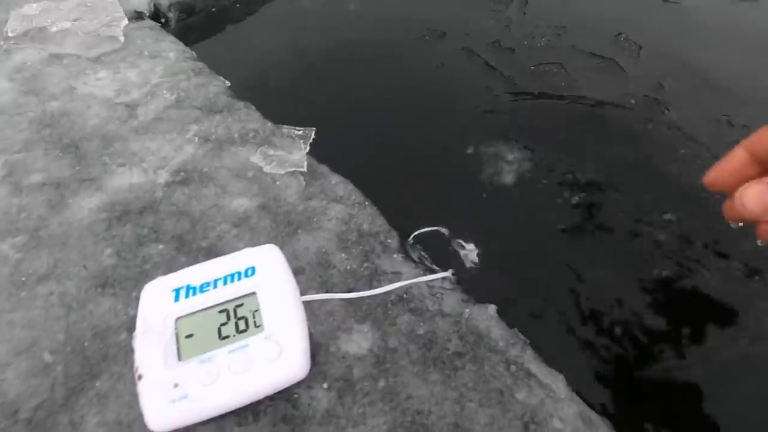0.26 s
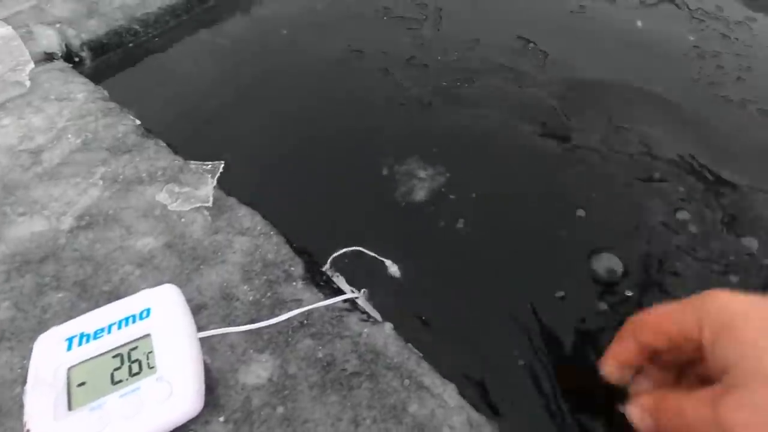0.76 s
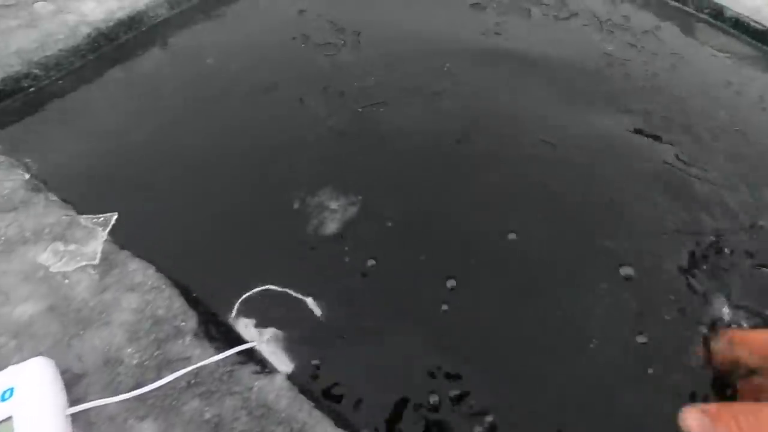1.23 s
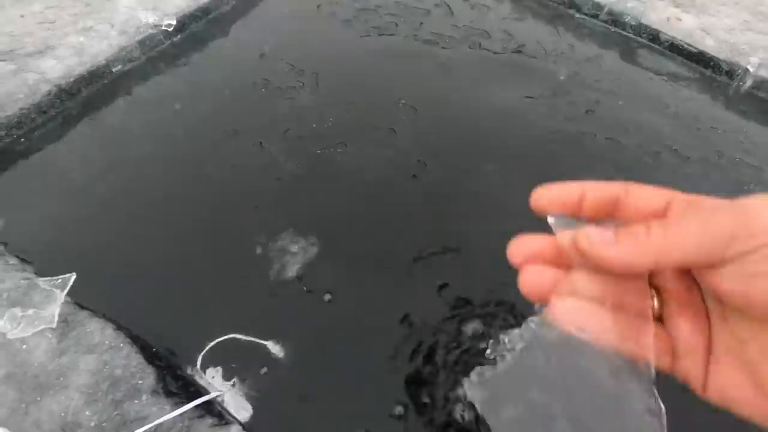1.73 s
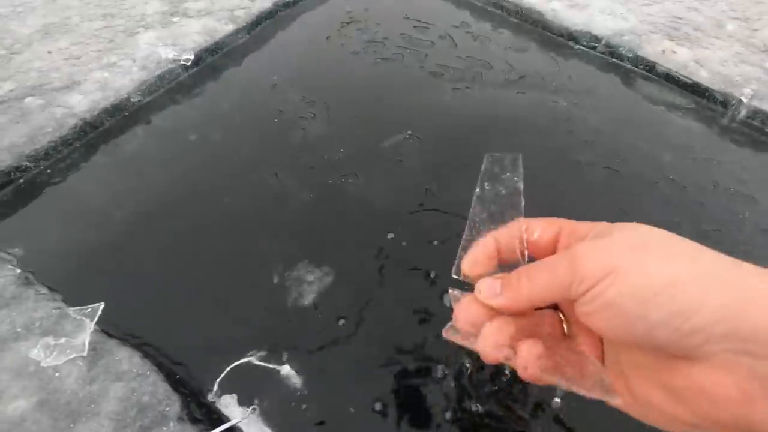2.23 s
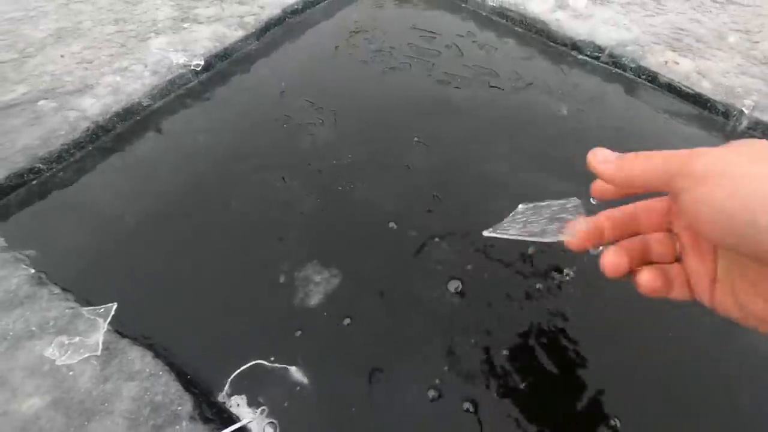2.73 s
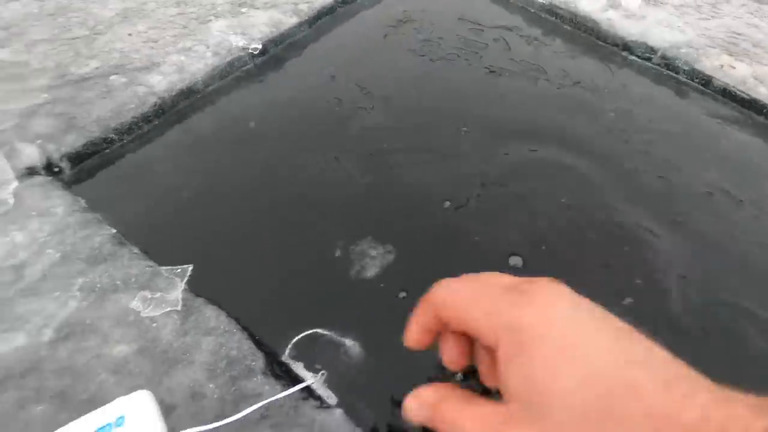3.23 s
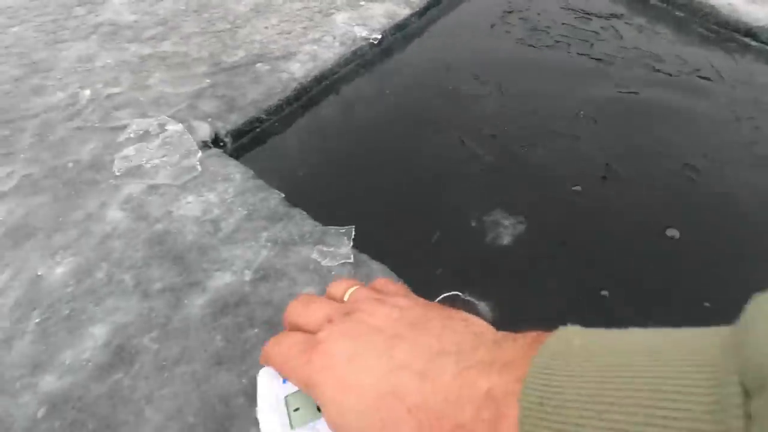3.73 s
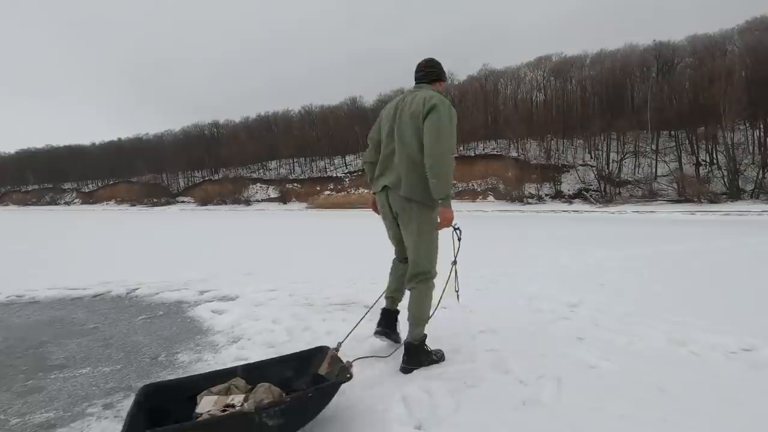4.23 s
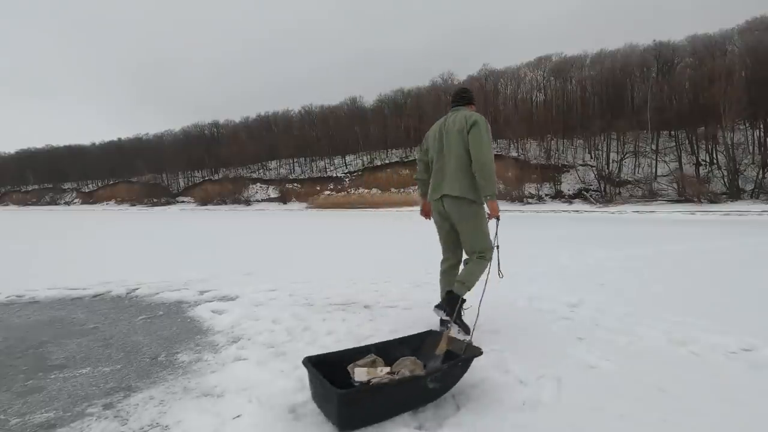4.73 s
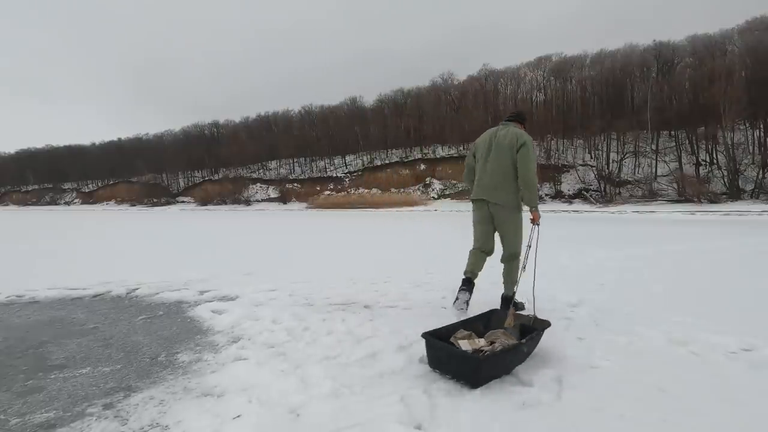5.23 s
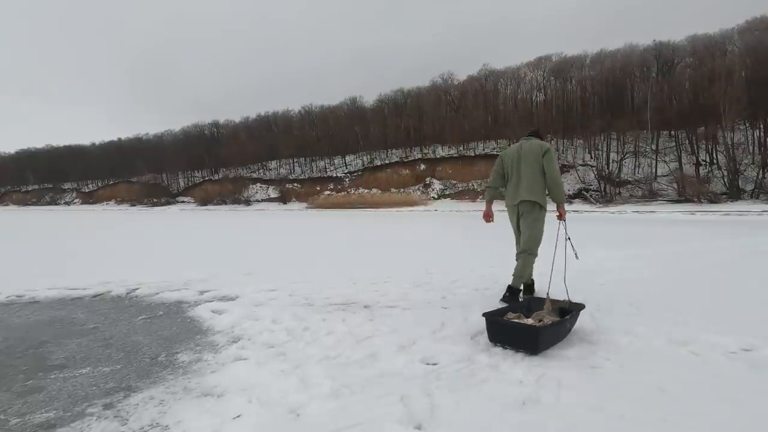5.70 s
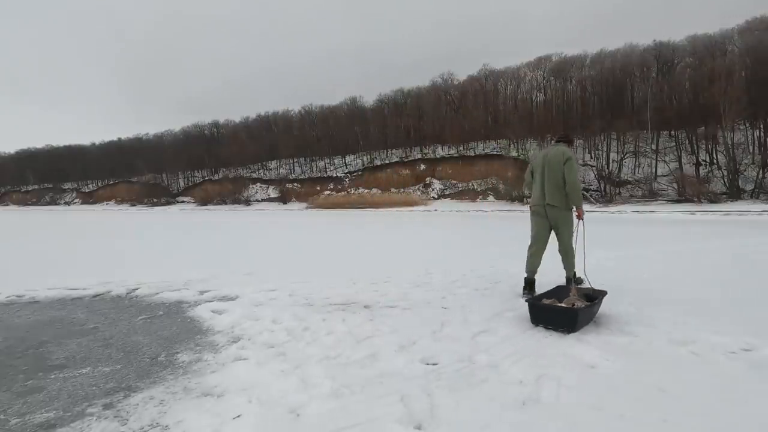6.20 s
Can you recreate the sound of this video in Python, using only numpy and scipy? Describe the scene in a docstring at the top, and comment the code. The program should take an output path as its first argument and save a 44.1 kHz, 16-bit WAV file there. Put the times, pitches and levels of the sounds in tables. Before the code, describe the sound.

Outdoors on a frozen lake, close and centred at first. A sharp splash and a thin ice snap open at 0 s, then water nearly stills until about 0.6 s. From 0.7 s a hand stirs: plopping bubbles, small chirps, ticking drops. Sloshing grows from 1.25 s and is fullest at 1.4-1.9 s, with deeper gurgles. Brittle glassy snaps come near 2.0 and 2.2 s, followed by thinning trickle and ticks, rising-pitch drips at 2.86 and 3.07 s, and a last small splash around 2.97 s. Low wind rumbles throughout, thumping softly at 3.5-3.7 s. At 3.8-4.0 s a light plastic box scrapes and knocks on ice. At 4.1 s a hard cut opens into stereo: a plastic sled drags over snow, grainy hiss over hollow hum, swelling with each tug. Boots crunch near 4.2 and 5.1 s; the drag softens and loses its fine sizzle until 6.4 s.

```python
"""Water sloshes, bubbles chirp, drops tick and thin ice snaps as a hand stirs a hole in lake ice.
A small plastic box then scrapes and knocks on the ice, and wind rumbles low throughout.
After a cut, a plastic sled is dragged over snow with boot steps, now heard in stereo.
Bubbles are gliding damped tones, ice is a set of ringing modes, and the rest is coloured noise:
short bursts for drops, steps and knocks, and slowly swelling hiss for spray, snow and wind."""
import sys
import numpy as np
from scipy import signal
from scipy.fft import rfft, irfft, next_fast_len
from scipy.io import wavfile
from scipy.ndimage import uniform_filter1d, map_coordinates

SR = 44100
rng = np.random.default_rng(int(sys.argv[2]) if len(sys.argv) > 2 else 0)


def wav_out(sig):
    """Save sig, one row per channel (or a flat mono array), as 16-bit PCM at SR to the path in sys.argv[1]."""
    wavfile.write(sys.argv[1], SR, np.round(np.clip(np.atleast_2d(sig).T, -1, 1) * 32767).astype(np.int16))


N = 284886

CUT_S = 4.122  # the lake hole gives way to the sled, seconds
# The hand stirring the water, before each layer's own gain:
# [t/s, spray level/dB, gurgle level/dB]
STIRRING = [(0, -63.5, -68), (0.1, -50.5, -54), (0.165, -52.5, -47.5), (0.19, -67, -69), (0.6, -81, -72.5),
            (0.66, -56, -54), (0.79, -56, -36), (0.88, -51.5, -48), (1.05, -59, -53), (1.14, -59.5, -86),
            (1.27, -41, -55.5), (1.45, -48.5, -32.5), (1.85, -44.5, -36), (1.93, -44.5, -46.5),
            (2.03, -54.5, -34.5), (2.16, -48, -78.5), (2.38, -62, -49.5), (2.52, -56.5, -72),
            (2.95, -66, -63), (3.09, -93, -61), (3.25, -99, -74)]


def amp(db):
    """Turn decibels into an amplitude factor."""
    return np.exp(np.asarray(db) * (np.log(10) / 20))


def unit(x):
    """Scale a signal to an rms (average strength) of 1."""
    return x / np.sqrt(np.mean(x ** 2) + 1e-20)


def plus(a_db, b_db):
    """Add the powers of two unrelated sounds and return their joint level in dB."""
    return 10 * np.log10(amp(a_db) ** 2 + amp(b_db) ** 2)


def along(points, hz):
    """Read a curve of (Hz, value) points, with straight lines on a log frequency axis."""
    f, v = np.transpose(points)
    return np.interp(np.log(hz + 1), np.log(f + 1), v)


def curves(rows):
    """Draw one level curve for each column after the time; -120 dB outside the rows."""
    s, *columns = np.transpose(rows)
    t = np.arange(N) / SR
    return [np.interp(t, s, column, left=-120, right=-120) for column in columns]


def swells(rows):
    """For each level column, sum the power of events that rise to a peak and fall away.

    The rise and fall times are those for a change of 20 dB."""
    s, rise, fall, *columns = np.transpose(rows)[:, :, None]
    coarse = np.arange(0, N, 16)  # every 16th sample is enough for a slow level
    late = coarse / SR - s
    steps_of_20_db = np.where(late < 0, -late / np.abs(rise), late / np.abs(fall))
    shape = amp(-20 * steps_of_20_db)
    levels = []
    for peak_db in columns:
        power = np.sum((amp(peak_db) * shape) ** 2, axis=0)
        level_db = 10 * np.log10(power + 1e-12)
        levels.append(np.interp(np.arange(N), coarse, level_db))
    return levels


def wobble(rate):
    """Draw a smooth random curve through rate random points a second."""
    points = rng.standard_normal(int(N * rate / SR) + 4)
    return map_coordinates(points, [np.arange(N) * rate / SR])


def filtered(x, response):
    """Multiply the spectrum of x by a response of frequency."""
    size = next_fast_len(N + 8192)
    hz = np.fft.rfftfreq(size, 1 / SR)
    return irfft(rfft(x, size) * response(hz), size)[..., :N]


def hiss(spectrum, spiky_db, rate, patchy_db=0):
    """Coloured noise of rms 1: its level wavers like packed grains, with patches in time and pitch."""
    noise = rng.standard_normal(N) * amp(spiky_db * wobble(rate))
    z = signal.stft(noise, nperseg=256)[2]
    field = uniform_filter1d(rng.standard_normal(z.shape), size=4, axis=0)  # smooth over pitch
    field = uniform_filter1d(field, size=5, axis=1)  # smooth over time
    grains = signal.istft(z * amp(patchy_db * unit(field)), nperseg=256)[1][:N]
    return unit(filtered(grains, lambda hz: amp(along(spectrum, hz))))


def burst(hz, width, t60, order=3):
    """A decaying noise burst of peak 1 around hz, reaching width octaves to either side."""
    t = np.arange(2048) / SR
    edges = np.clip([hz * 2 ** -width, hz * 2 ** width], 50, SR * .45)
    envelope = amp(-60 * t / t60) * (1 - np.exp(-t / 0.000076))
    x = rng.standard_normal(len(t)) * envelope
    x = signal.lfilter(*signal.butter(order, edges, "band", fs=SR), x)
    return x / np.abs(x).max()


def add(track, s, sound):
    """Mix a sound into the track from s seconds on."""
    track[round(s * SR):][:len(sound)] += sound


def chirps(s, hz, rise, life, db, fade_db, bend):
    """Bubbles as damped sines whose pitch glides by the ratio rise, later for a larger bend."""
    fade_db, bend = np.reshape(fade_db, (-1, 1)), np.reshape(bend, (-1, 1))
    t = np.arange(int(life.max() * 4 / 3 * SR)) / SR
    u = t / life[:, None]  # age as a share of the life
    glide = np.clip(rise[:, None], 9 / 10, 3) - 1
    phase = 2 * np.pi * hz[:, None] * t * (1 + glide * u ** bend / (bend + 1))
    closing = np.clip(2 - 1.5 * u, 0, 1) ** 2  # closes from 2/3 to 4/3 of the life
    onset = 1 - np.exp(-t * hz[:, None] / 0.5)
    wave = amp(db[:, None] - fade_db * u ** 0.55) * np.sin(phase) * closing * onset
    at = (s[:, None] * SR).astype(int) + np.arange(len(t))
    return np.bincount(at.ravel(), wave.ravel(), N + SR)[:N]


def swarm(level_db, count, low_hz, octaves, cycles, spread_db):
    """Small bubbles at random moments, as strong as the stirring is then."""
    draw = rng.random((count, 5))
    s = draw[:, 0] * STIRRING[-1][0]
    hz = low_hz * 2 ** (octaves * draw[:, 1])
    rise = 0.936 + 0.4 * draw[:, 3] ** 2
    life = cycles * (0.11 + 2.0 * draw[:, 4] ** 2) / hz
    boost_db = -spread_db * np.log(draw[:, 2] + 1 / 25)  # a few are much louder
    db = level_db[(s * SR).astype(int)] + boost_db
    return chirps(s, hz, rise, life, db, fade_db=18.5, bend=0.33)


def water():
    """Moving water sprays and gurgles, full of small bubbles; single bubbles, drips and ticks stand out."""
    # Splashes: [peak t/s, rise/s, fall/s, spray level/dB, gurgle level/dB], before each layer's gain
    splashes = [(0.034, 0.017, 0.055, -22.5, -46), (0.06, 0.04, 0.029, -27.5, -52),
                (0.147, 0.005, 0.01, -44, -62), (0.637, 0.012, 0.036, -40.5, -69),
                (1.272, 0.021, 0.034, -35.5, -64), (1.4, 0.15, 0.12, -45.5, -30),
                (1.595, 0.066, 0.05, -35.5, -34), (1.72, 0.063, 0.14, -36, -21.5),
                (1.97, 0.1, 0.45, -39.5, -58.5), (2.09, 0.08, 0.08, -31.5, -62),
                (2.42, 0.14, 0.015, -49, -70.5), (2.72, 0.061, 0.049, -45.5, -55),
                (2.975, 0.011, 0.053, -28.5, -43.5), (3.0, 0.044, 0.074, -40, -76)]
    # Colour of the spray: [f/Hz, relative level/dB]
    spray_colour = [(880, -23.5), (1500, -8.5), (3380, -1.5), (4690, -4), (7170, -12), (8320, -23),
                    (13700, -27.5), (16000, -54.5)]
    # Colour of the gurgle: [f/Hz, relative level/dB]
    gurgle_colour = [(400, -18), (650, -11), (1100, 10), (2000, 4), (3500, -39)]
    # Single bubbles that stand out, low and high:
    # [t/s, start f/Hz, pitch ratio (held to 0.9-3), life/s, starting level/dB]
    single_bubbles = [(0.03, 1480, 1.2, 0.0055, -27.5), (0.049, 1200, 1.2, 0.034, -35),
                      (0.055, 2340, 0.98, 0.01, -29), (0.059, 3090, 0.94, 0.018, -32.5),
                      (0.09, 1760, 0.98, 0.0099, -35), (0.099, 1600, 1.2, 0.015, -37),
                      (0.115, 1470, 1.02, 0.0095, -37), (0.146, 3500, 1.18, 0.006, -30),
                      (0.161, 934, 1.03, 0.021, -47.5), (0.705, 1200, 0.97, 0.022, -44),
                      (0.728, 1016, 0.89, 0.023, -41), (0.755, 525, 1.1, 0.011, -28.5),
                      (0.799, 930, 0.91, 0.014, -33), (0.9, 1790, 0.96, 0.027, -47),
                      (1.411, 1440, 1.02, 0.012, -31), (1.716, 4100, 0.92, 0.0088, -29.5),
                      (0.726, 1540, 0.94, 0.012, -35.5), (0.724, 386, 1.22, 0.048, -38),
                      (0.764, 694, 1.06, 0.046, -36.5), (0.803, 1230, 0.98, 0.02, -30),
                      (0.818, 1042, 1.57, 0.024, -21), (0.825, 800, 1.32, 0.04, -37.5),
                      (0.772, 945, 1.55, 0.03, -39), (0.865, 1360, 0.98, 0.017, -41),
                      (0.867, 790, 1.05, 0.022, -41), (0.924, 1326, 0.93, 0.031, -42),
                      (1.018, 2240, 1.26, 0.0076, -31), (1.051, 1214, 1.25, 0.019, -41),
                      (1.086, 2580, 1.08, 0.0066, -33), (1.141, 2880, 1.05, 0.011, -38.5),
                      (1.181, 3800, 1.1, 0.0095, -32.5), (1.213, 2220, 1.1, 0.016, -35),
                      (1.3, 1410, 1.21, 0.017, -24.5), (1.34, 4550, 1.04, 0.0031, -26.5),
                      (1.36, 539, 0.78, 0.023, -31.5), (1.389, 1010, 1.2, 0.011, -30),
                      (1.395, 577, 0.92, 0.052, -33.5), (1.408, 1060, 1.32, 0.017, -25.5),
                      (1.455, 569, 1.2, 0.034, -36), (1.482, 1326, 1, 0.0094, -26),
                      (1.491, 2180, 1.14, 0.021, -33.5), (1.58, 2400, 1.2, 0.0046, -19.5),
                      (1.628, 1440, 1.7, 0.018, -26.5), (1.694, 1370, 1.3, 0.024, -25),
                      (1.694, 1037, 0.78, 0.025, -27.5), (1.723, 1058, 2, 0.036, -30),
                      (1.731, 940, 0.98, 0.0071, -24.5), (1.76, 934, 1.1, 0.012, -28),
                      (1.743, 876, 1.25, 0.02, -31.5), (1.804, 550, 1.16, 0.036, -40.5),
                      (1.819, 1920, 1.1, 0.0046, -26), (1.836, 2030, 1.15, 0.0031, -20),
                      (1.871, 1166, 0.93, 0.0064, -35), (1.954, 1180, 1.15, 0.016, -25.5),
                      (2.134, 1820, 0.9, 0.015, -31), (2.189, 3700, 0.7, 0.011, -30),
                      (2.229, 3170, 1.5, 0.011, -28), (2.36, 3960, 1.22, 0.0091, -37),
                      (2.411, 2390, 1.1, 0.013, -38), (2.442, 1150, 1.57, 0.031, -47),
                      (2.48, 1480, 0.93, 0.009, -43.5), (2.556, 2810, 1.1, 0.013, -41.5),
                      (2.576, 3580, 1.07, 0.0073, -35.5), (2.704, 1730, 1.03, 0.008, -39.5),
                      (2.738, 2200, 1.1, 0.0079, -34), (2.746, 3830, 1.16, 0.0093, -35.5),
                      (2.972, 794, 0.98, 0.004, -26)]
    # Lone drops whose bubble rings long and thin:
    # [t/s, start f/Hz, pitch ratio (held to 0.9-3), life/s, starting level/dB, fade/dB, lateness of rise]
    drips = [(2.861, 1450, 1.9, 0.083, -30.5, 46, 8.3), (3.0744, 1534, 3.1, 0.066, -37, 28, 3.4)]
    # Drops and chips landing: [t/s, peak level/dB, centre f/Hz]
    ticks = [(0.043, -34, 3800), (0.086, -35, 3280), (0.836, -36.5, 2880), (1.183, -30, 3830),
             (1.228, -32, 3250), (1.263, -27.5, 3900), (1.577, -23.5, 4200), (1.671, -27, 2150),
             (1.836, -29.5, 3000), (2.079, -25.5, 4000), (2.097, -24, 4700), (2.257, -34, 3490),
             (2.3005, -38.5, 3756), (2.53, -31.5, 4050), (2.704, -30, 4900), (2.747, -32, 3900),
             (2.8589, -33, 3040), (2.97, -27, 5800), (2.9856, -25, 3840), (3.393, -65, 7370),
             (3.41, -51.5, 4400)]

    spray_db, gurgle_db = map(plus, curves(STIRRING), swells(splashes))
    spray_db += 2.5 * wobble(30)  # the trickle comes in clumps
    out = amp(spray_db - 6) * hiss(spray_colour, spiky_db=3, rate=280, patchy_db=4)
    # Fine droplets tick
    out += swarm(spray_db + 2, count=800, low_hz=2500, octaves=1.4, cycles=4, spread_db=4.5)
    # Small bubbles in the spray
    out += swarm(spray_db + 3, count=1400, low_hz=1800, octaves=1.6, cycles=12, spread_db=3.5)
    out += amp(gurgle_db - 14) * hiss(gurgle_colour, spiky_db=4.0, rate=58, patchy_db=3.5)
    # Deeper bubbles in the gurgle
    out += swarm(gurgle_db - 7, count=1600, low_hz=650, octaves=1.9, cycles=12, spread_db=2.5)

    singles = chirps(*np.transpose(single_bubbles), fade_db=9.5, bend=0.91)
    singles += chirps(*np.transpose(drips))
    flutter_db = 4 * wobble(170)  # single bubbles and drips waver as the surface over them moves
    out += amp(flutter_db) * singles
    for s, db, hz in ticks:
        add(out, s, amp(db) * burst(hz, width=.75, t60=.011))
    return out


def wind():
    """Wind buffets low over a shared, steadier body; after the cut each side has its own buffeting, left
    stronger."""
    # Wind on the microphone, before the gains after the cut: [t/s, buffet level/dB]
    wind_strength = [(0, -40.5), (0.2, -39.5), (0.32, -54.5), (0.55, -47.5), (1.15, -47), (1.5, -45.5),
                     (1.65, -32.5), (1.8, -50), (1.92, -39.5), (2.05, -52), (2.9, -52.5), (3.3, -49.5),
                     (3.9, -47), (4.1, -51.5), (4.8, -46.5), (5.85, -59.5), (6.46, -50)]
    # Low thumps on the microphone: [peak t/s, rise/s, fall/s, buffet level/dB, body level/dB]
    thumps = [(3.5, 0.13, 0.075, -35.5, -43), (3.56, 0.064, 0.023, -53, -33.5),
              (3.68, 0.058, 0.041, -31.5, -43)]
    # Colour of the buffeting: [f/Hz, relative level/dB]
    buffet_colour = [(8.8, -17.5), (15, -3.5), (43, 0.5), (110, -11.5), (140, -40.5), (240, -120)]
    # Colour of the steadier body: [f/Hz, relative level/dB]
    body_colour = [(41, -28), (70, -7), (145, -1.5), (338, -18), (400, -27), (520, -46.5), (880, -120)]

    strength_db = curves(wind_strength)[0]
    thump_db, thud_db = swells(thumps)
    swing_db = strength_db - strength_db.mean()
    body_db = plus(-53.5 + 0.4 * swing_db, thud_db)  # the body follows 0.4 of the swings
    after = np.arange(N) > CUT_S * SR
    one = hiss(buffet_colour, spiky_db=0.5, rate=5.3)
    other = hiss(buffet_colour, spiky_db=2.5, rate=12.0)
    buffet = np.where(after, [amp(5) * one, amp(-1) * other], one)  # left, right
    body = amp(body_db) * hiss(body_colour, spiky_db=2.5, rate=23)
    return amp(plus(strength_db, thump_db)) * buffet + body


def still_air():
    """A faint, steady background of coloured noise."""
    # Colour of the quiet: [f/Hz, relative level/dB]
    air_colour = [(150, -24), (250, -11.5), (557, -12), (800, -45), (1330, -24), (2320, -38), (7300, -31),
                  (8500, -42), (16000, -47.5)]
    return amp(-70) * hiss(air_colour, spiky_db=1, rate=60, patchy_db=2)


def ice():
    """Each snap is a crack that rings the shard in several modes, the higher ones dying slightly sooner."""
    # Snaps of thin ice: [t/s, level/dB, main mode f/Hz, brightness/dB per mode, main mode's 60 dB decay/s]
    snaps = [(0.027, -23, 2110, 0.5, 0.017), (1.954, -27, 2152, 2.5, 0.023), (1.9957, -22, 2327, 7, 0.018),
             (2.001, -22.5, 1892, -8.5, 0.0088), (2.2126, -18.5, 2360, -5.5, 0.012),
             (2.9727, -38.5, 2330, -12, 0.035)]
    # Modes of a shard: [multiple of the main mode, relative level/dB]
    shard_modes = [(.33, -41), (1, -0.5), (1.77, 8.5), (2.35, -2), (2.9, -7.5), (4.2, -22.5)]

    out = np.zeros(N)
    t = np.arange(4096) / SR
    for s, db, hz, bright_db, t60 in snaps:
        ring = np.zeros(len(t))
        for k, (ratio, level) in enumerate(shard_modes):
            mode_db = level + bright_db * (k - 2.5) - 60 * t * ratio ** 0.038 / t60
            ring += amp(mode_db) * np.sin(2 * np.pi * hz * ratio * t)
        add(out, s, amp(db) * ring * (1 - np.exp(-t / 0.00016)))
        crack = burst(1.9 * hz, width=.9, t60=.8 * t60, order=2)
        add(out, s, amp(db + bright_db + 1.5) * crack)
    return out


def box():
    """Plastic scrapes over rough ice in grains; light touches are dull; bumps knock it."""
    # Fingers shift the box on the ice: [peak t/s, rise/s, fall/s, level/dB]
    shifts = [(3.67, 0.23, 0.095, -60.5), (3.866, 0.026, 0.035, -40.5), (3.903, 0.0069, 0.19, -45.5),
              (4.005, 0.25, 0.015, -54.5)]
    # Colour of the scrape: [f/Hz, relative level/dB]
    scrape_colour = [(350, -15.5), (600, -6), (846, -16.5), (1240, -6.5), (1930, -14), (3400, -9),
                     (4500, -15), (7400, -18), (8500, -28), (16000, -39)]
    # Knocks on bumps in the ice: [t/s, peak level/dB, centre f/Hz]
    knocks = [(3.599, -54, 930), (3.833, -51, 715), (3.864, -37, 1245), (3.929, -35.5, 1240),
              (3.946, -34.5, 3060), (4.016, -41, 1880)]

    level_db = swells(shifts)[0]
    grains = hiss(scrape_colour, spiky_db=3.5, rate=400, patchy_db=2)
    dull = filtered(grains, lambda hz: 1 / (1 + (hz / 3000) ** 4))
    firm = np.clip((level_db + 63.5) / 9, 0, 1)  # 0 is a light touch, 1 a firm one
    out = amp(level_db) * (dull + firm * (grains - dull))
    for s, db, hz in knocks:
        add(out, s, amp(db) * burst(hz, width=0.26, t60=0.025))
    return out


def drag():
    """The hull drones and the snow hisses under it; the finest sizzle is lost first as the sled moves off."""
    # Snow under the sled: [t/s, hiss level/dB]
    snow_hiss = [(4.125, -53), (4.152, -62), (4.162, -38.5), (4.5, -40.5), (4.95, -43), (5.36, -43),
                 (5.385, -46), (5.8, -49.5), (6.46, -48)]
    # Tugs on the rope: [peak t/s, rise/s, fall/s, hull level/dB, hiss level/dB]
    tugs = [(4.18, 0.047, 0.12, -34, -34), (4.66, 0.38, 0.63, -41.5, -37.5), (5.11, 0.13, 0.54, -39, -36.5),
            (5.57, 0.18, 0.34, -44.5, -43), (5.93, 0.18, 0.27, -43, -50.5), (6.15, 0.15, 0.33, -42.5, -45)]
    # Colour of the hull's drone: [f/Hz, relative level/dB]
    hull_colour = [(88, -43), (150, -4), (301, 5), (578, -1.5), (1200, -10.5), (1560, -61), (2640, -120)]
    # Colour of the snow's hiss: [f/Hz, relative level/dB]
    snow_colour = [(410, -22.5), (700, -9.5), (1180, -5), (1900, -10), (2900, -8), (5000, -17.5),
                   (8000, -27.5), (16000, -48)]
    # Colour of the finest crystals: [f/Hz, relative level/dB]
    sizzle_colour = [(2000, -19.5), (4000, 2.5), (7000, 1), (9500, -13.5), (12000, -16), (14500, -31),
                     (16000, -45.5)]

    since = np.arange(N) / SR - CUT_S
    drone_db = -46 - 3 * since  # between tugs the drone fades by 3 dB a second
    hull_db, snow_db = map(plus, [drone_db, curves(snow_hiss)[0]], swells(tugs))
    sizzle_db = snow_db - 3.0 * since - 4.5
    out = amp(hull_db) * hiss(hull_colour, spiky_db=.5, rate=40, patchy_db=1.8)
    out += amp(snow_db) * hiss(snow_colour, spiky_db=1.3, rate=270, patchy_db=1.8)
    out += amp(sizzle_db) * hiss(sizzle_colour, spiky_db=1.0, rate=250, patchy_db=1.0)
    return (since > 0) * out


def sled():
    """The drag and the boots' crunch reach both sides; a second drag, opposite in sign, widens them."""
    # Boots breaking the crust, before the stereo spread: [t/s, peak level/dB]
    boot_steps = [(4.202, -21.5), (5.097, -25.5)]
    # Crust crumbling under a boot, before the stereo spread: [peak t/s, rise/s, fall/s, level/dB]
    crumbling = [(5.1, 0.027, 0.11, -33), (5.36, 0.5, 0.022, -43.5)]
    # Colour of the crumbling crust: [f/Hz, relative level/dB]
    crust_colour = [(600, -35.5), (1200, 3.5), (1800, -14), (4000, -13.5), (6000, -41)]
    # Likeness of left and right: [f/Hz, likeness from 0 to 1]
    likeness = [(500, .95), (1300, .9), (3000, .82), (7000, .65), (12000, .25)]
    # Phase lead of the left side: [f/Hz, lead/radians]
    left_lead = [(100, -.15), (600, -.3), (3500, -.6), (5500, -1), (7300, -2.5), (9000, -1), (15000, -2.8)]

    shared = drag() + amp(swells(crumbling)[0]) * hiss(crust_colour, spiky_db=-2.0, rate=120)
    for s, db in boot_steps:
        add(shared, s, amp(db) * burst(1250, width=.8, t60=.03))

    def turn(hz):
        """The angle that splits the power between alike and opposite sound."""
        return np.arccos(np.clip(along(likeness, hz), -1, 1)) / 2

    def sides(hz):
        """Phase and level of left and right; the right side faces the treble."""
        phase = np.exp(.5j * np.outer([1, -1], along(left_lead, hz)))
        treble_db = 2.2 * (hz / 10000) ** 2
        return phase * amp(np.outer([-1, 1], treble_db))

    alike = filtered(shared, lambda hz: sides(hz) * np.cos(turn(hz)))
    opposite = filtered(drag(), lambda hz: sides(hz) * np.sin(turn(hz)))
    return alike + opposite * [[1], [-1]]


def scene():
    """Sum all the sources over still air."""
    return water() + wind() + still_air() + ice() + box() + sled()


def record(dry):
    """Keep nothing at or above the band limit of 15750 Hz."""
    return filtered(dry, lambda hz: hz < 15750)


dry = scene()
out = record(dry)
wav_out(out)
```